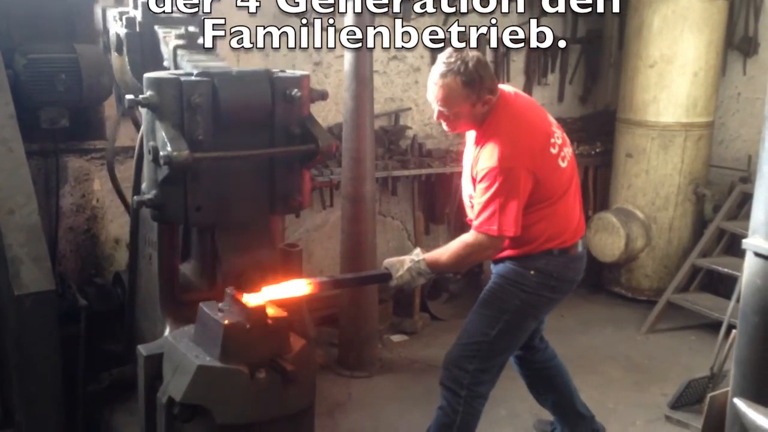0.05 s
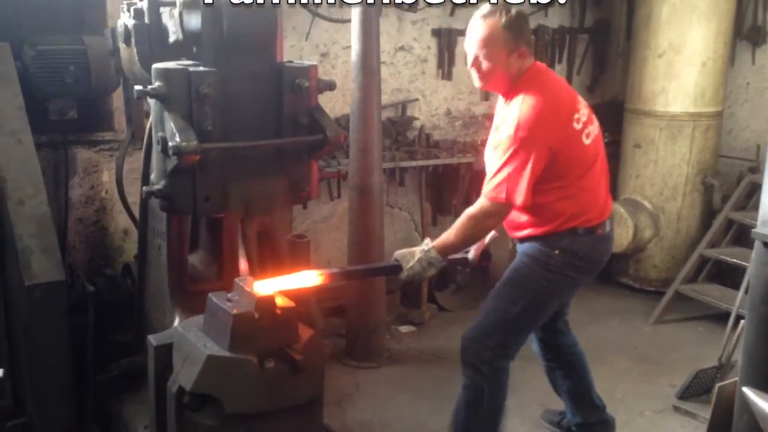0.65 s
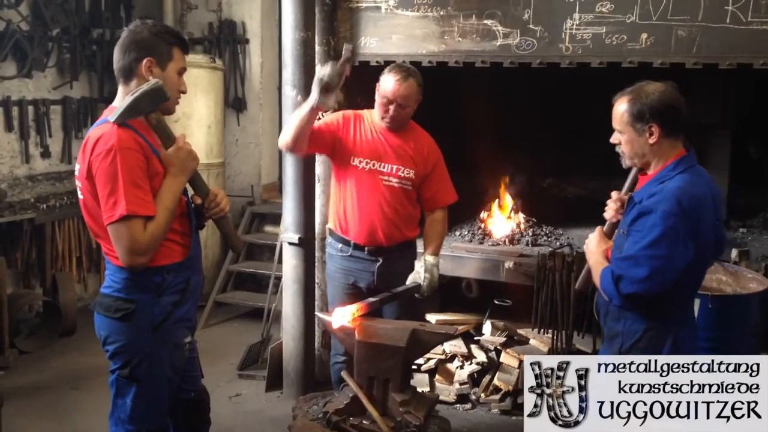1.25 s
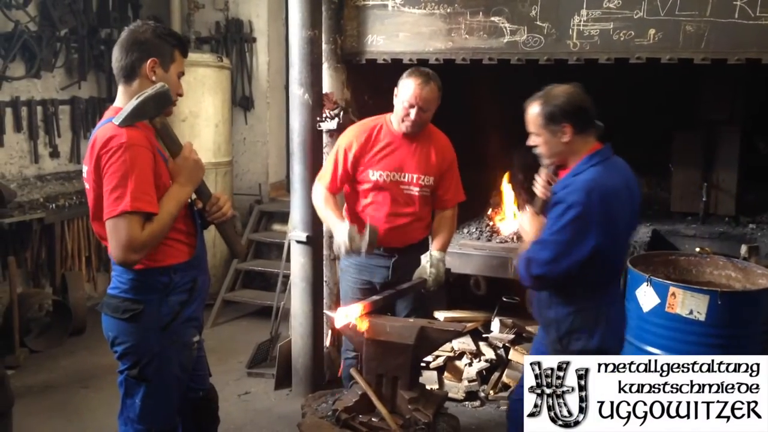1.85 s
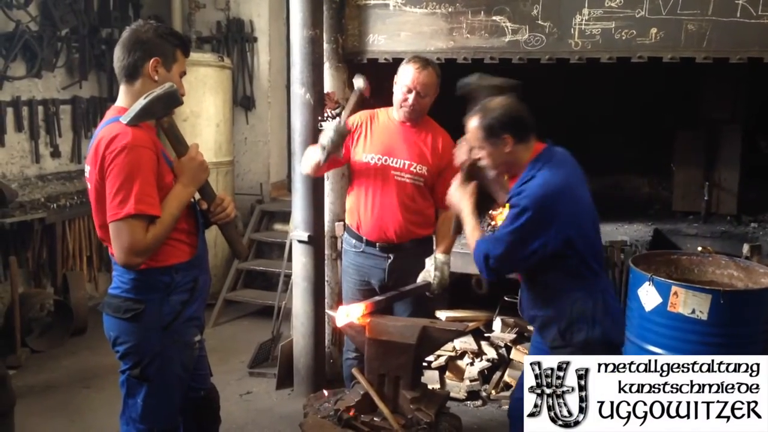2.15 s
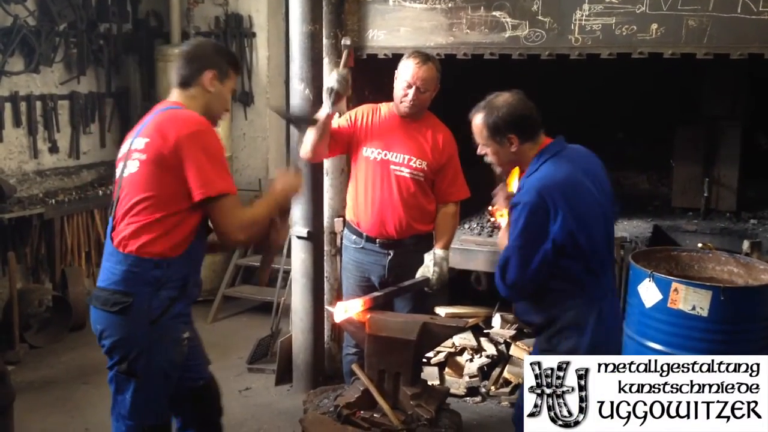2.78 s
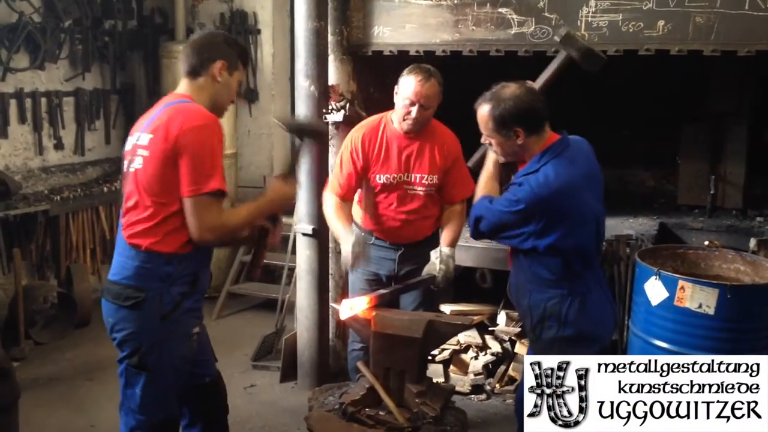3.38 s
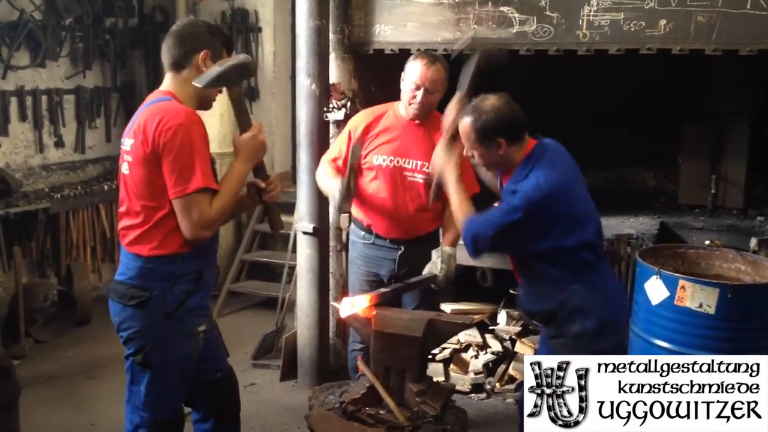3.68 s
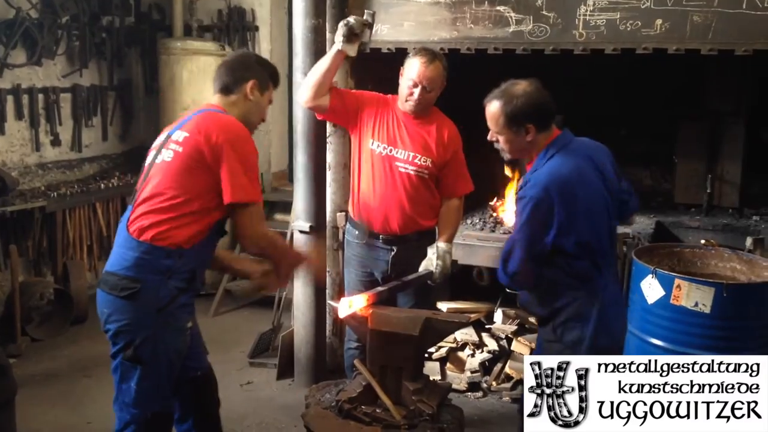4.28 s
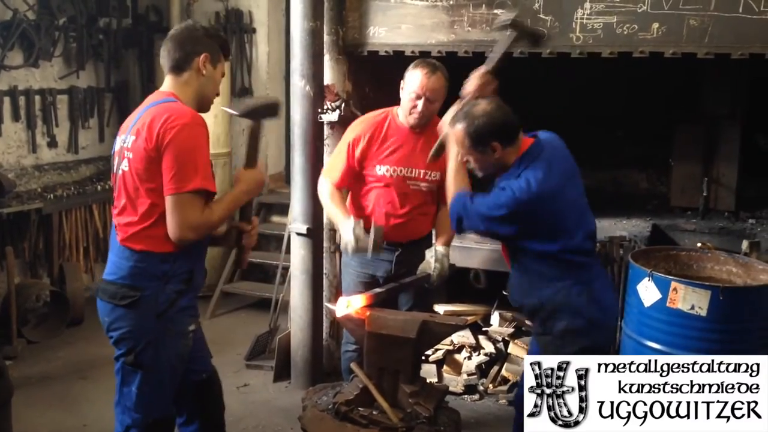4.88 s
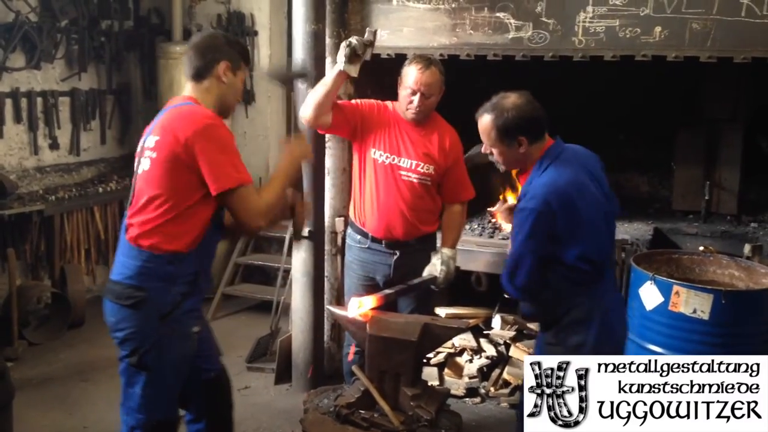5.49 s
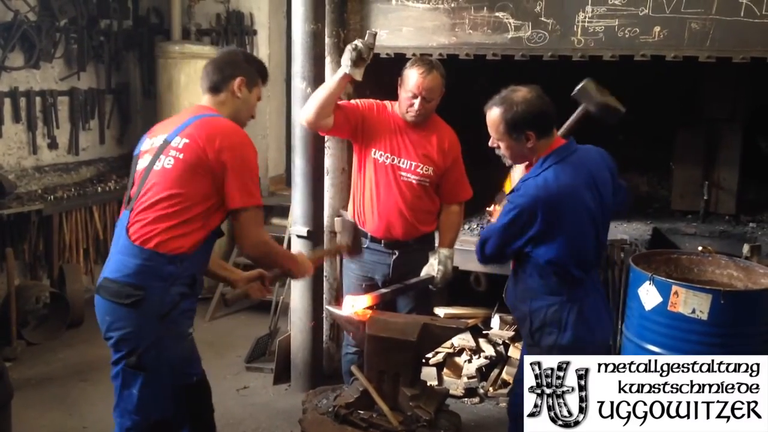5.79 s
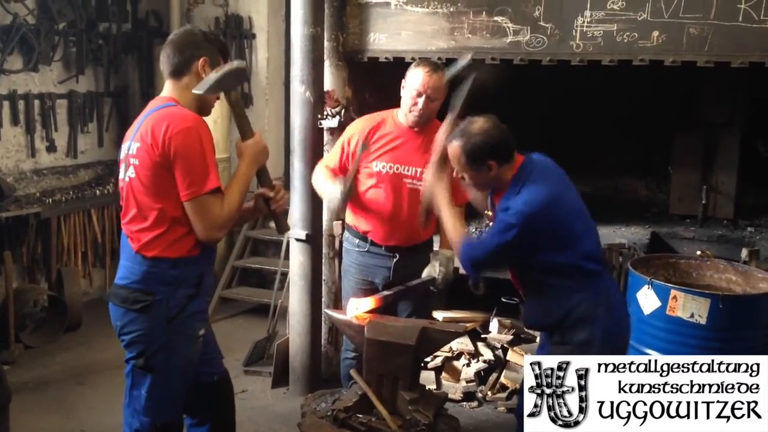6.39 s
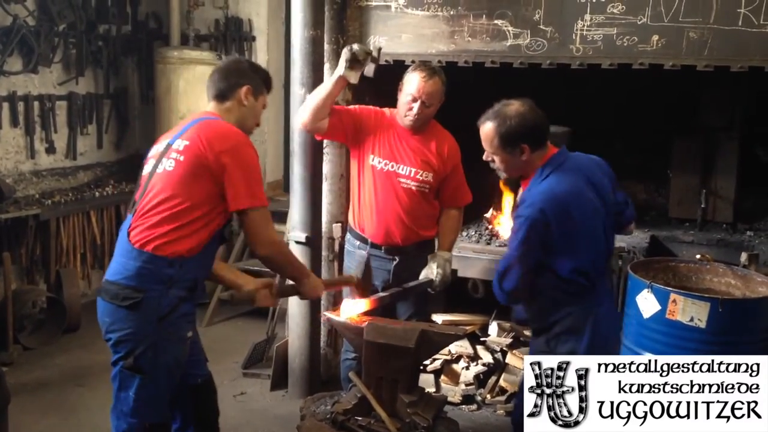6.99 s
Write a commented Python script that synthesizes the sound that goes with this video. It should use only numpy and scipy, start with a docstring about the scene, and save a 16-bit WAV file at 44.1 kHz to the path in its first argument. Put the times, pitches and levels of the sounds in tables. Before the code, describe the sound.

A power hammer pounds right at the start and again at about 0.4 seconds, heavy and dull over its rumbling drive, with a puff of exhaust air and a faint high squeak between the blows. At 0.7 seconds the machine cuts off abruptly, leaving the soft rush of a forge fire and a faint blower hum that continue throughout. At 1.7 seconds a hand hammer strikes hot iron on an anvil, followed by one sledgehammer at 2.4 and another at 3.0. The three keep taking turns, settling into a steady beat a little under half a second apart, twelve blows in all, the last at 7 seconds. Each is a loud clang with a thud and a bright, wavering ring; the sledgehammers sound weightier. Glancing blows at 3.0 and 5.7 seconds add a thin, longer ping. The microphone stands well back, so the hard-walled workshop's short reverberation surrounds every hit.

```python
"""Power hammer and three smiths in a forge.

Inside a hard-walled workshop, one microphone, far enough off that the room outweighs the direct sound.
A power hammer pounds twice over its own running noise. The scene cuts to the hearth's rush and the
blower's hum, where hand hammer, first sledge and second sledge strike hot iron on an anvil in turn.
The more of a blow reaches the anvil, the less the iron bar rings. A limiter flattens each blow."""
import sys
import numpy as np
from scipy import signal
from scipy.fft import rfft, irfft
from scipy.io import wavfile
from scipy.ndimage import uniform_filter1d

SR = 44100
rng = np.random.default_rng(int(sys.argv[2]) if len(sys.argv) > 2 else 0)


def persist_wave(psi):
    """Save psi, clipped to +-1, as 16-bit WAV."""
    counts = np.round(np.clip(psi, -1, 1) * 32767).astype(np.int16)
    wavfile.write(sys.argv[1], SR, np.atleast_2d(counts).T)


N = 319725
TIME = np.arange(N) / SR
TAIL = np.arange(SR) / SR  # the second after a blow
SCENE_CUT_S = 0.736  # the sound cuts from the power hammer to the hearth and anvil
FREE_T60_S = 2.6  # decay of the metal's faint free ring

# blows at the anvil: (time [s], hammer, force [dB], bite into the hot iron [dB], main note [dB],
# drive into the upper modes [dB], hardness of the contact [dB], glancing [yes/no])
BLOWS = [(1.717, "hand", 2.5, -1.5, -2, -11.5, -1.5, False),
         (2.4244, "first sledge", 1.8, -2, -4.5, -4.5, -3.5, False),
         (2.998, "second sledge", 2.5, -1.5, 1, -1, -4, True),
         (3.4748, "hand", -0.2, -1.5, 8.5, 9.5, 10, False),
         (3.919, "first sledge", 3.2, 1.5, -10, 2, -2, False),
         (4.377, "second sledge", 2.8, -1.5, -.5, 3, 2.5, False),
         (4.8048, "hand", 3.5, 0, 2.5, -4, -3, False),
         (5.181, "first sledge", 2.5, 1.3, -2, 2, -2.5, False),
         (5.7106, "second sledge", 3.3, -1, -3.5, -0.5, 8.5, True),
         (6.154, "hand", 4.5, -1, 1.8, 3, 1.3, False),
         (6.6061, "first sledge", 1.2, 0.8, 0.5, 1.5, 3, False),
         (7.0286, "second sledge", -1.5, 4.5, -1.5, 4.5, 4, False)]


def anvil():
    """The three smiths strike in turn."""
    out = np.zeros(N)
    for s, hammer, force_db, *landing in BLOWS:
        add(out, s, amp(force_db) * blow(s, hammer, *landing))
    return out


# what each hammer brings out: (thud [dB], anvil's upper modes [dB], iron bar [dB])
HAMMER_VOICES = {"hand": (-6.5, -4.5, 2.7), "first sledge": (1.8, -1.8, 5.3),
                 "second sledge": (1.7, -1.4, -1.5)}
# how long the main note holds under each hammer: (hold [s])
NOTE_HOLDS = {"hand": .15, "first sledge": .11, "second sledge": .125}
# modes ringing at the anvil, all as (frequency [Hz], level [dB], t60 [s])
UPPER_MODES = [(1528, -26, .6), (1880, -26, .35), (2455, -30, .3), (2665, -28, .15), (2880, -20, .25),
               (2905, -29, .15), (3187, -35, .3), (3808, -27, .2)]  # the anvil's body
SINGING_MODE = [(3392, -26, .4)]  # one anvil mode that lingers
SHIMMER_MODES = [(4613, -42, .15), (5717, -39, .4), (5850, -35, .2), (6280, -42, .2), (6428, -44, .3),
                 (6525, -40, .3), (6767, -46, .3), (7897, -43, .2), (8053, -41, .25), (8274, -40, .4),
                 (8945, -46, .15), (9755, -45, .2), (10188, -51, .2)]  # the anvil's highest modes
BAR_MODES = [(1147, -36, .2), (1755, -30, .2), (2752, -28, .2)]  # the hot iron
BLOCK_MODES = [(115.6, -33, 0.15), (309, -30, 0.21)]  # the anvil's block and the floor under it
HEAD_PINGS = {"hand": (9020, -40, 0.048), "first sledge": (12000, -46, 0.09),
              "second sledge": (14040, -44, 0.17)}  # the head of each hammer
GLANCING_PING = [(8385, -32.5, .55)]  # the long ping of a glancing blow


def blow(s, hammer, bite_db, note_db, drive_db, hardness_db, glancing, strike_db=19):
    """A clang with a thud below and a crack above; it rings anvil, bar, block and hammer head."""
    weight_db, modes_db, bar_db = HAMMER_VOICES[hammer]
    thud_db = weight_db + bite_db
    crack_db = 1.9 + 0.68 * hardness_db  # a harder contact cracks brighter
    upper_db = modes_db + drive_db
    singing_db = upper_db + 7.5 - 1.3 * s  # weakens as the work goes on
    room = workshop(echo_db=-4.5, build_s=0.0051, scatter_s=0.00099)
    out = amp(strike_db) * signal.fftconvolve(contact(thud_db, crack_db), room)[:SR]
    out += amp(note_db) * main_note(NOTE_HOLDS[hammer])
    out += amp(upper_db) * ring(UPPER_MODES, wet=5.2, free_db=-21.5)
    out += amp(singing_db) * ring(SINGING_MODE, wet=5.8, free_db=-14)
    out += amp(hardness_db - 3) * ring(SHIMMER_MODES, wet=4.5, free_db=-50)
    out += amp(bar_db - 0.33 * drive_db) * ring(BAR_MODES, wet=3.0)  # the bar loses as the anvil gains
    out += amp(thud_db) * ring(BLOCK_MODES, wet=0.5)
    return out + ring(GLANCING_PING if glancing else [HEAD_PINGS[hammer]], wet=0.99)


# spectrum of a blow at the anvil's face: (frequency [Hz], level [dB])
STRIKE_SPECTRUM = [(35, -22), (60, 1.5), (120, 3.5), (190, -5.5), (300, -0.5), (950, -3), (1500, 1.5),
                   (2400, 2), (3400, -4.5), (4300, -11), (8000, -22.5), (15000, -36.5)]
# broad resonances of iron pinched between hammer and anvil: (frequency [Hz], width [Hz], boost [dB])
CLANG_RESONANCES = [(648, 160, 7), (1151, 163, 8), (1877, 350, 7), (2910, 56, 10.5), (3770, 150, 10.5),
                    (4830, 420, 5.5)]


def contact(thud_db, crack_db, count=240):
    """The click of one blow; where it lands decides which of the many short overtones stand out."""
    tilt = [(800, thud_db), (1350, 0), (1850, 0), (4500, crack_db)]  # (frequency [Hz], level [dB])
    overtones = np.column_stack([np.geomspace(500, 16000, count), 3.2 * rng.standard_normal(count)])

    def colour(hz):
        overtone_db = read(overtones, hz) * (hz > overtones[0, 0])
        clang_db = sum(db / (1 + (2 * (hz - mid) / width) ** 2) for mid, width, db in CLANG_RESONANCES)
        return read(STRIKE_SPECTRUM, hz) + read(tilt, hz) + overtone_db + clang_db
    return click(colour)


def main_note(hold_s, hz=2196.5, swell_hz=9.3, crest_s=0.048, waver=0.76, sag_db_per_s=26):
    """The anvil's main note swells and dips about nine times a second in the room, and wavers."""
    drift = unit(uniform_filter1d(uniform_filter1d(complex_noise(SR), size=1200), size=500))
    level = amp(-22 - sag_db_per_s * TAIL) * envelope(TAIL, .008, hold_s, fall_db_per_s=200)
    level += amp(-37 - 60 * TAIL / FREE_T60_S) * (1 - TAIL)  # the free ring, faded out over the second
    swell = 1 + 0.4 * np.exp(2j * np.pi * swell_hz * (TAIL - crest_s))
    return level * ((swell + waver * drift) * np.exp(2j * np.pi * hz * TAIL)).imag


def ring(modes, wet, free_db=-27, beat_depth=0.95):
    """Modes damped by the soft iron, drawn out and set beating by the room; a faint free ring lingers."""
    t, out = TAIL[::32], np.zeros(SR)  # envelopes move slowly, so a coarse clock will do
    for hz, db, t60 in modes:
        room_t60 = read(ROOM_DECAY, hz)
        direct, room = amp(-60 * t / t60), amp(-60 * t / room_t60)
        reflected = signal.fftconvolve(direct, complex_noise(len(t)) * room)[:len(t)]
        swell = unit(unit(direct) + wet * unit(reflected)) * np.sqrt(np.mean(room ** 2))
        beat = 1 + beat_depth * np.exp(2j * np.pi * (rng.uniform(5.4, 6.5) * t + rng.random()))
        swell += beat * amp(free_db - 60 * t / FREE_T60_S) * (1 - t) * (t60 / room_t60) ** 2
        out += amp(db) * (np.interp(TAIL, t, swell) * np.exp(2j * np.pi * hz * TAIL)).imag
    return out


# power hammer contacts, the second blow a slap on the die and then the press: (time [s], level [dB])
POUNDS = [(0.0, 7), (.427, -1), (.438, 3.5)]
# spectra of its impact, running drive and exhaust air: (frequency [Hz], level [dB])
POUND_SPECTRUM = [(30, -17), (70, -1), (130, -0.5), (300, 3.5), (500, 4), (800, -1.5), (1700, 0),
                  (3500, -9.5), (7000, -18), (15000, -31)]
DRIVE_SPECTRUM = [(30, -13), (110, -4), (450, -1), (800, -3.5), (1500, -7), (3500, -27), (7000, -38),
                  (15000, -59)]
EXHAUST_SPECTRUM = [(300, -8), (1500, 8), (4500, -5), (8000, -19.5), (15000, -42)]
# the ram lifts and air escapes: (time [s])
RAM_LIFTS = [0.248, .715]
# the ram rubs in its guides: (time [s], level [dB])
RAM_RUBS = [(.31, -46), (.58, -54)]
# the squeak of that rubbing: (frequency [Hz], width [Hz], level [dB])
SQUEAK_TONES = [(6380, 22, 4.5), (11700, 130, -12)]


def power_hammer(pound_db=28, run_db=-27, exhaust_db=-27):
    """Heavy dull blows over the rumble of the drive, with exhaust air and a squeak as the ram lifts."""
    out = amp(run_db) * noise(DRIVE_SPECTRUM)
    puffs = sum(envelope(TIME - s, rise_s=.023, hold_s=.045, fall_db_per_s=110) for s in RAM_LIFTS)
    out += amp(exhaust_db) * puffs * noise(EXHAUST_SPECTRUM)
    rub = sum(amp(db) * envelope(TIME - s, rise_s=.035, hold_s=.015, fall_db_per_s=104)
              for s, db in RAM_RUBS)
    out += rub * sum(amp(db) * whistle(hz, width) for hz, width, db in SQUEAK_TONES)
    impact = click(lambda hz: read(POUND_SPECTRUM, hz))
    for s, db in POUNDS:
        room = workshop(echo_db=-15.0, build_s=0.0056)
        add(out, s, amp(pound_db + db) * signal.fftconvolve(impact, room))
    return out * np.clip((SCENE_CUT_S - TIME) / .002, 0, 1)


# the fire's rush in the background: (frequency [Hz], level [dB])
FIRE_SPECTRUM = [(30, -27), (60, -7), (100, 0), (200, -1), (560, -4.5), (1100, -4), (1350, -8), (2200, -7),
                 (3000, -11.5), (5400, -22), (15000, -45.5)]
# hum of the blower: (frequency [Hz], level [dB])
BLOWER_TONES = [(76, -61), (113, -54), (479, -54), (764.4, -47), (2362, -61)]
# resonances of air rushing in the flue: (frequency [Hz], width [Hz], level [dB])
FLUE_RESONANCES = [(484, 50, -4.5), (766, 130, -0.5), (950, 120, -2), (1970, 85, -3.5)]
# the background sinks slightly as the hammering goes on: (time [s], level [dB])
BACKGROUND_LEVEL = [(2.4, 0.03), (3.3, -1.9)]


def hearth(fire_db=-40.5, flue_db=-48):
    """The fire's rush, air in the flue and the blower's hum, heard from the scene cut on."""
    hum = sum(amp(db) * whistle(hz, width_hz=2.7) for hz, db in BLOWER_TONES)
    flue = sum(amp(flue_db + db) * whistle(hz, width) for hz, width, db in FLUE_RESONANCES)
    fire = amp(fire_db) * noise(FIRE_SPECTRUM)
    level = amp(np.interp(TIME, *np.transpose(BACKGROUND_LEVEL))) * (TIME > SCENE_CUT_S)
    return level * (fire + hum + level * flue)


# reverberation of the workshop: (frequency [Hz], t60 [s])
ROOM_DECAY = [(80, 0.87), (500, 0.58), (1500, 0.6), (4000, 0.61), (8000, 0.41), (15000, 0.24)]
# direct sound and wall echoes reaching the microphone: (nominal delay [s], relative gain)
ARRIVALS = [(0, 0.43), (.0022, 0.91), (.0042, 0.6), (0.012, 0.15), (0.0151, 0.55), (0.022, 0.25),
            (.029, 0.42)]


def workshop(echo_db, build_s, scatter_s=0.00045):
    """Room response: echoes smeared by cluttered walls, then a dense tail whose treble dies first."""
    hz, t, spectra = signal.stft(rng.standard_normal(SR), SR, nperseg=256)
    decay = amp(-60 * t / read(ROOM_DECAY, hz)[:, None])
    tail = signal.istft(spectra * decay, SR, nperseg=256)[1][:SR]
    tail *= 1 - np.exp(-TAIL / build_s)
    tail /= np.linalg.norm(tail)
    for delay, gain in ARRIVALS:
        echo = rng.standard_normal(SR // 100) * np.exp(-TAIL[:SR // 100] / (scatter_s + delay / 10))
        add(tail, delay * rng.uniform(.93, 1.4), gain * amp(echo_db) * echo / np.linalg.norm(echo))
    return tail


def amp(db):
    """Decibels to gain."""
    return 10 ** (np.asarray(db) / 20)


def read(points, hz):
    """Interpolates a curve on a log-frequency axis."""
    f, value = np.transpose(points)
    return np.interp(np.log(hz + 1), np.log(f), value)


def unit(x):
    """Scales to rms 1."""
    return x / np.sqrt(np.mean(abs(x) ** 2) + 1e-20)


def add(mix, s, sound):
    """Mixes a sound in at time s."""
    part = mix[max(round(s * SR), 0):][:len(sound)]
    part += sound[:len(part)]


def envelope(t, rise_s, hold_s, fall_db_per_s):
    """Attack, hold and release, starting at t = 0."""
    return np.clip(t / rise_s, 0, 1) * amp(-fall_db_per_s * np.maximum(t - rise_s - hold_s, 0))


def complex_noise(size):
    """White noise of random amplitude and phase."""
    return rng.standard_normal(size) + 1j * rng.standard_normal(size)


def noise(points):
    """Steady noise of a given spectrum, rms 1."""
    gain = amp(read(points, np.fft.rfftfreq(N, 1 / SR)))
    return unit(irfft(rfft(rng.standard_normal(N)) * gain, N))


def whistle(hz, width_hz):
    """A wavering tone: noise in one narrow resonance, rms 1."""
    drift = signal.lfilter([1], [1, -np.exp(-np.pi * width_hz / SR)], complex_noise(N))
    return unit((uniform_filter1d(drift, size=100) * np.exp(2j * np.pi * hz * TIME)).real)


def click(colour, size=4096):
    """The minimum-phase click whose spectrum is colour(Hz), in dB."""
    log_gain = np.log(amp(colour(abs(np.fft.fftfreq(size, 1 / SR)))))
    return np.fft.ifft(np.exp(np.conj(signal.hilbert(log_gain)))).real[:size // 2]


def scene():
    """The whole forge at the microphone, in one channel."""
    return (power_hammer() + anvil() + hearth())[None]


def hold_peaks(db, fall_db_per_s):
    """Follows a level up at once and back down at a steady rate."""
    fall = TIME * fall_db_per_s
    return np.maximum.accumulate(db + fall) - fall


def record(dry, limit_db=-15.0, attack_s=0.00044, ceiling=0.46, low_cut_hz=36, high_cut_hz=15200):
    """The microphone drops the deepest bass; a quick limiter, rounded peaks and a treble cut follow."""
    sound = signal.sosfilt(signal.butter(3, low_cut_hz, "high", fs=SR, output="sos"), dry)
    power_db = 10 * np.log10(abs(uniform_filter1d(sound[0] ** 2, size=200)) + 1e-12)
    over_db = np.maximum(hold_peaks(power_db, fall_db_per_s=130) - limit_db, 0)
    ducked_db = np.minimum(over_db, 5) * (TIME > SCENE_CUT_S)  # anvil blows: the last dB creep back
    over_db = np.maximum(over_db, hold_peaks(ducked_db, fall_db_per_s=11))
    lag = np.exp(-1 / (attack_s * SR))  # the first crack slips through before the gain drops
    held = sound * amp(-.8 * signal.lfilter([1 - lag], [1, -lag], over_db))  # ratio 5:1
    rounded = held / (1 + (held / ceiling) ** 4) ** (1 / 4)
    high_cut = signal.firwin(401, high_cut_hz, window=("kaiser", 9), fs=SR)
    return signal.oaconvolve(rounded, high_cut[None], "same")


dry = scene()
out = record(dry)
persist_wave(out)
```